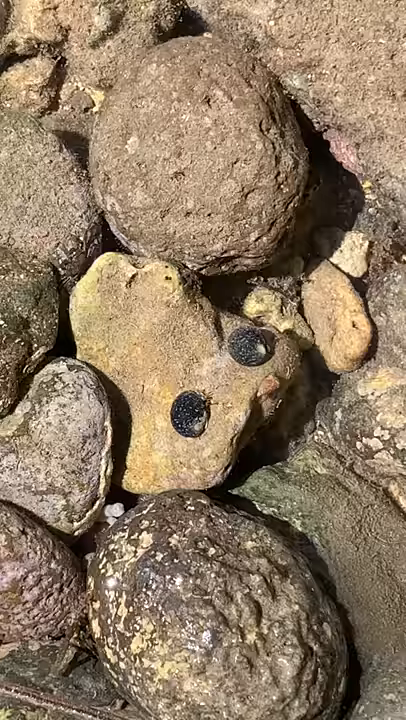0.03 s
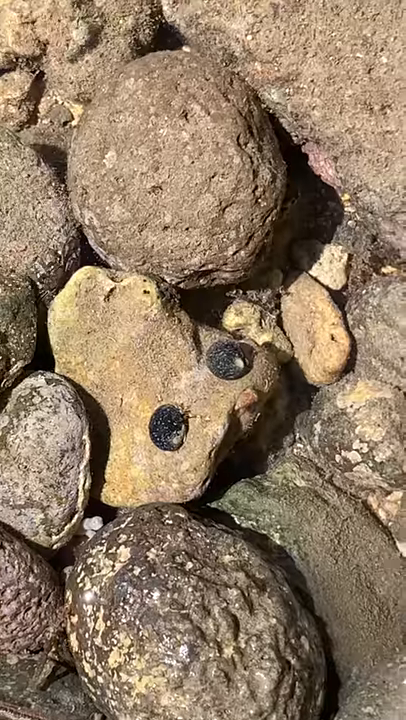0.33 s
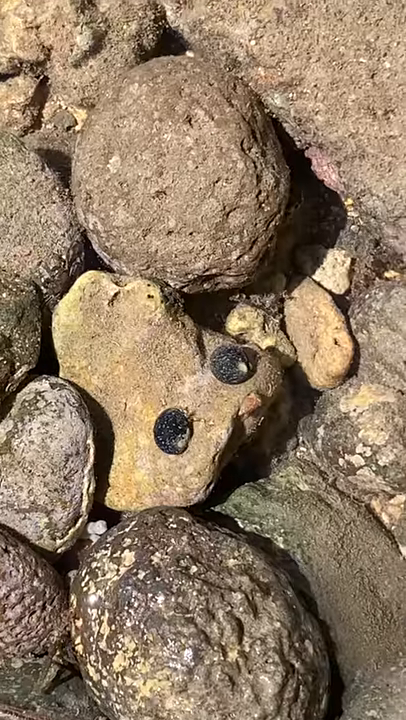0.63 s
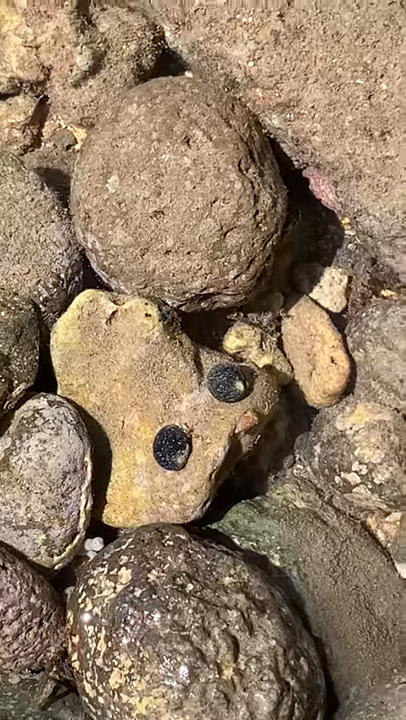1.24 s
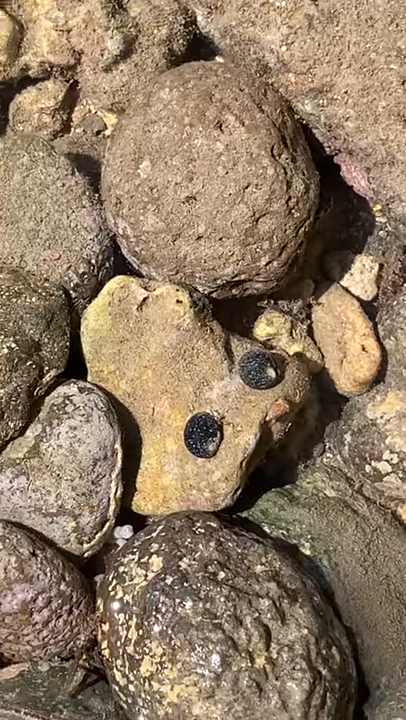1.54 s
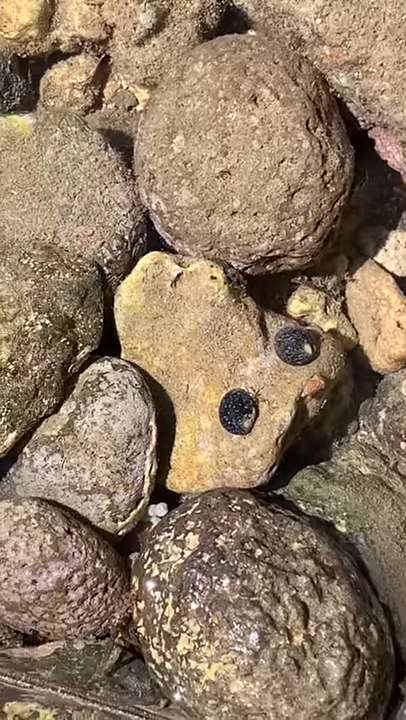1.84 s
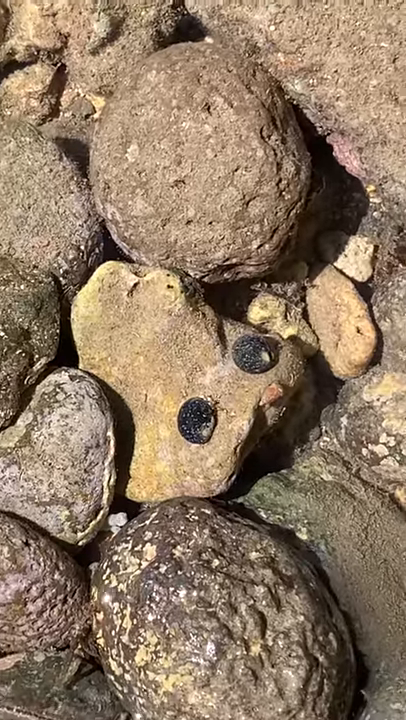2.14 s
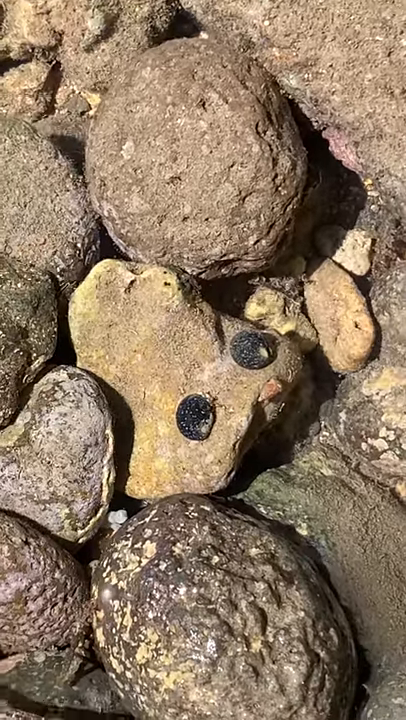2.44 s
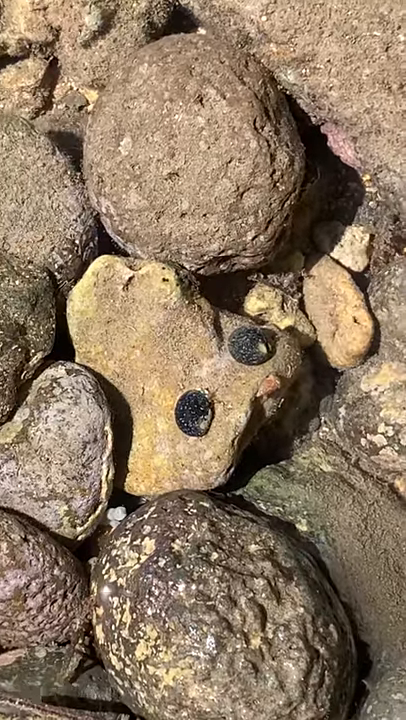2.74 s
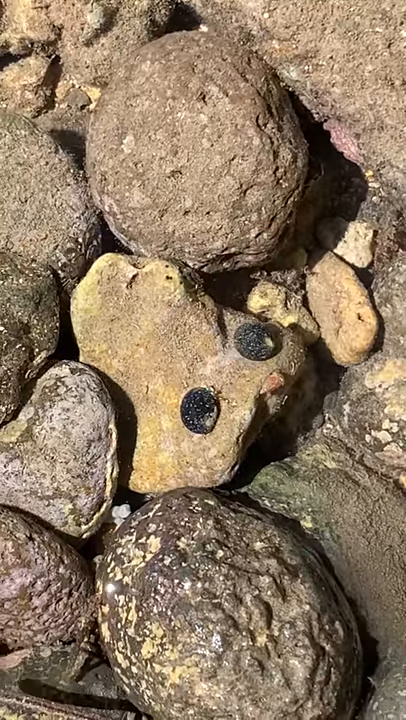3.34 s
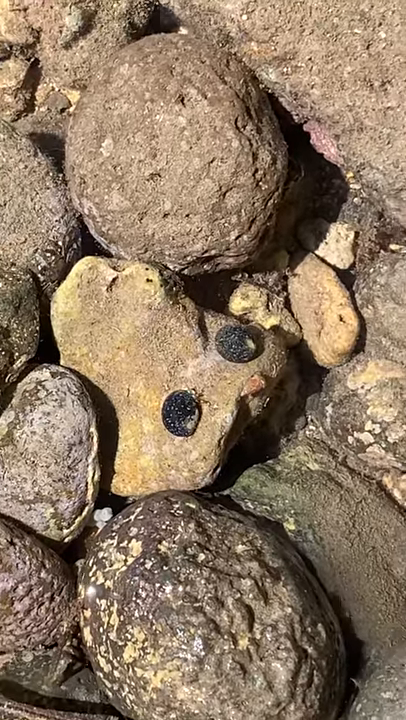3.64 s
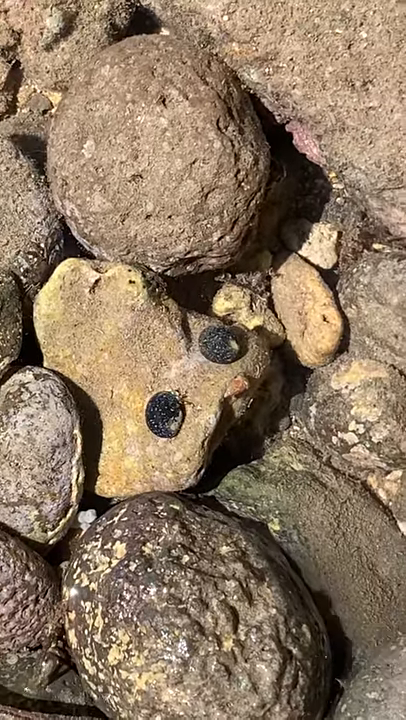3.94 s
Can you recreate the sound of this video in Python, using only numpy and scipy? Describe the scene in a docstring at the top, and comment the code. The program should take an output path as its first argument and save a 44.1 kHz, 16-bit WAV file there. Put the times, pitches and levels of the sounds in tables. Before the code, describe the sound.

A distant engine drones and rumbles throughout, over a soft wash of far surf that swells once past the middle. Water hisses faintly between shore stones, with a few light ticks, heard on a hand-held phone.

```python
"""Distant engine off a rocky shore

A far engine drones on a slowly sinking pitch, with a weaker second hum beside it. Its rumble and
a wash of far surf swell a little past the middle. Water hisses, bubbles and fizzes between the
stones, with a few faint ticks. A hand-held phone hears it all through two closely spaced ports."""
import sys
import numpy as np
from scipy import signal
from scipy.fft import rfft, irfft
from scipy.io import wavfile
from scipy.ndimage import uniform_filter1d

SR = 44100
rng = np.random.default_rng(int(sys.argv[2]) if len(sys.argv) > 2 else 0)


def log_audio(samples):
    """Write samples as a 16-bit WAV file to the path given in sys.argv[1]."""
    # one column per channel
    frames = np.atleast_2d(samples).T
    # limit to full scale, then quantise
    limited = np.clip(frames, -1, 1)
    pcm = np.round(limited * 32767).astype(np.int16)
    wavfile.write(sys.argv[1], SR, pcm)


N = 176400  # 4 seconds
TIME = np.arange(N) / SR


def undb(db):
    """Turn decibels into a number to multiply by."""
    return 10 ** (np.asarray(db) / 20)


def unit(x):
    """Scale a signal so that its average strength (rms) is 1."""
    return x / np.sqrt(np.mean(x ** 2))


def curve(rows):
    """Join (time, value) rows with straight lines."""
    return np.interp(TIME, *np.array(rows).T)


def walk(rate):
    """A smooth random wobble of size 1 that takes `rate` steps a second."""
    hold = max(int(SR / rate), 2)
    steps = np.repeat(rng.standard_normal(4000)[:N // hold + 1], hold)
    return unit(uniform_filter1d(uniform_filter1d(steps, hold), hold)[:N])


def hump(peak_s, half_s):
    """A bell-shaped rise and fall."""
    return np.exp(-.5 * np.minimum(((TIME - peak_s) / half_s) ** 2, 60))


def noise():
    """Two unrelated noises: the direct and the scattered part of a wide source."""
    return rng.standard_normal((2, N))


def shaped_noise(tone):
    """Noise of strength 1 whose tone follows (frequency, level) rows."""
    hz, db = np.array(tone).T
    f = np.maximum(np.fft.rfftfreq(N, 1 / SR), 1)
    gain = undb(np.interp(np.log(f), np.log(hz), db))
    return unit(irfft(rfft(noise()) * gain, N))


def resonate(x, hz, width_hz):
    """Keep one band of a sound by passing it twice through a resonance; strength 1."""
    b, a = signal.iirpeak(min(hz, .45 * SR), hz / width_hz, fs=SR)
    return unit(signal.sosfilt([np.r_[b, a]] * 2, x))


# The tones in the drone and in the second hum: multiple of the base pitch, relative level/dB
DRONE_TONES = [(1, -20), (2, 0), (3, -11.5), (4, -11.5), (5, -14), (6, -22), (16, -29.5)]
HUM_TONES = [(1, -2), (2, -10.5), (3, -18.5), (4, -10), (5, -19.5)]
# How loud the drone's main tone is: t/s, level/dB
MAIN_TONE_LEVEL = [(.1, -44.5), (.45, -39), (.77, -44), (.92, -36.5), (1.35, -41.5), (1.56, -33),
                   (1.72, -35), (1.95, -32), (2.22, -32), (2.36, -33), (2.58, -33.5), (2.85, -37),
                   (3.2, -36), (4.0, -37)]
# Rise and fall of the hum's lowest tone, and of all remaining tones: t/s, relative level/dB
HUM_BASE_SWELL = [(.1, 6), (.75, -11), (1.0, 2), (1.2, -5.5), (1.7, 8), (2.05, 5), (2.4, -10), (2.75, -13),
                  (3.2, 3), (4.0, -6)]
OTHER_TONES_SWELL = [(.1, -2), (.55, -1), (1.1, -0.5), (1.5, 1), (1.85, 1), (2.15, 8.5), (2.45, 12),
                     (2.7, -1), (2.9, -4.5), (3.3, -0.5), (3.7, 5.5), (4.0, -1)]

def engine():
    """A drone and a hum sink together in pitch; each tone fades in and out on its way through the air."""
    firing_hz, sag_hz_per_s, hum_hz = 64.47, .33, 76.25
    other_tones_db, hum_db = -39, -45
    hz = firing_hz - sag_hz_per_s * TIME
    drone_phase = 2 * np.pi * np.cumsum(hz * (1 + .0036 * walk(9))) / SR
    hum_phase = 2 * np.pi * np.cumsum(hum_hz * hz / firing_hz * (1 + .00586 * walk(8.27))) / SR
    swell_db = curve(OTHER_TONES_SWELL)

    def tone(phase, db):
        return np.sqrt(2) * np.sin(phase + rng.uniform(0, 2 * np.pi)) * undb(db)

    out = np.zeros((2, N))  # row 0 is direct sound, row 1 is scattered
    for multiple, db in DRONE_TONES:
        if multiple == 2:  # the main tone
            moving_db = curve(MAIN_TONE_LEVEL) + .27 * walk(8)
            jitter = 0
        else:
            moving_db = other_tones_db + swell_db + 2.5 * walk(9)
            jitter = .12 * walk(21.83)  # radians
        out[0] += tone(multiple * drone_phase + jitter, db + moving_db)
    for multiple, db in HUM_TONES:
        moving_db = curve(HUM_BASE_SWELL) if multiple == 1 else swell_db
        out[0] += tone(multiple * hum_phase, hum_db + db + moving_db + 1.1 * walk(7.74))
    return out


# Tone of the deep and the upper rumble: f/Hz, relative level/dB
DEEP_TONE = [(15, -48.5), (26, -35), (38, -5.5), (50, 10), (64, 18), (85, 11.5), (105, 11), (135, 12),
             (200, -64.5)]
UPPER_TONE = [(30, -41.5), (115, 0.5), (165, 0.5), (230, -0.5), (275, -4), (315, -7.5), (360, -11.5),
              (415, -15), (460, -16.5), (700, -80.5)]
# How each rises and falls: t/s, relative level/dB
DEEP_LEVEL = [(.1, -43.5), (.75, -45.5), (1.25, -41), (1.6, -40.5), (2.1, -41.5), (2.7, -43.5),
              (3.0, -45.5), (3.3, -41.5), (4.0, -43.5)]
UPPER_LEVEL = [(.1, -41), (.7, -40), (1.15, -42), (1.5, -36), (1.8, -42), (2.05, -37.5), (2.4, -33.5),
               (2.65, -37), (2.9, -45.5), (3.15, -41), (3.55, -37), (4.0, -39.5)]

def rumble():
    """The engine's turbulent roar: a deep part and a fluttering part above it."""
    deep = shaped_noise(DEEP_TONE) * undb(curve(DEEP_LEVEL) + 1.4)
    upper = shaped_noise(UPPER_TONE) * undb(curve(UPPER_LEVEL) - 4)
    flutter = undb(2.06 * walk(25))
    return deep + upper * flutter


# Tone of the low, middle and high parts of the surf: f/Hz, relative level/dB
LOW_SURF_TONE = [(300, -18), (430, 2.5), (560, 4), (615, 7.5), (740, 3.5), (900, -34.5)]
MID_SURF_TONE = [(650, -18), (790, -1), (915, 0.5), (1020, -8.5), (1120, 2.5), (1200, -3), (2000, -73)]
HIGH_SURF_TONE = [(900, -66), (1280, 6), (1450, 3.5), (1640, 1.5), (1850, -4.5), (2250, -4.5),
                  (2700, -11.5), (4000, -12), (8000, -56)]
# How each rises and falls: t/s, relative level/dB
LOW_SURF_LEVEL = [(.1, -53.5), (.85, -54.5), (1.1, -52), (1.5, -54.5), (2.1, -54), (2.85, -54), (3.3, -56),
                  (3.48, -53), (3.72, -53), (4.0, -54.5)]
MID_SURF_LEVEL = [(.1, -55), (.5, -59), (1.15, -55.5), (1.5, -54), (1.7, -53.5), (2.0, -54), (2.6, -54),
                  (2.9, -57.5), (3.3, -58.5), (3.5, -56.5), (3.72, -54), (3.9, -56)]
HIGH_SURF_LEVEL = [(.1, -62.5), (.55, -61), (.8, -63.5), (1.2, -61), (1.45, -59.5), (1.9, -58.5),
                   (2.2, -60), (2.75, -61.5), (3.3, -63.5), (3.7, -61.5), (4.0, -59)]

def surf():
    """Far waves blend into a wavering wash, made of three bands of noise."""
    low = shaped_noise(LOW_SURF_TONE) * undb(curve(LOW_SURF_LEVEL))
    middle = shaped_noise(MID_SURF_TONE) * undb(curve(MID_SURF_LEVEL) + 3)
    high = shaped_noise(HIGH_SURF_TONE) * undb(curve(HIGH_SURF_LEVEL) + 3)
    return flicker(low + middle + high) * undb(1.14 * walk(50))


def flicker(x, depth_db=1.8):
    """Each narrow band wavers on its own, as air and ground reflections shift."""
    f = np.fft.rfftfreq(N, 1 / SR)
    centres_hz = np.geomspace(500, 2400, num=12)
    spectrum = rfft(x)
    bands = (irfft(spectrum * np.interp(f, centres_hz, pick), N) for pick in np.eye(len(centres_hz)))
    return sum(band * undb(depth_db * walk(14)) for band in bands)


# Tone of the hiss: f/Hz, relative level/dB
HISS_TONE = [(1000, 2), (2200, 6.5), (3200, 11.5), (4000, -1), (4800, -1), (6000, 6), (6700, -2), (7400, 0),
             (8700, -7.5), (11000, -1.5), (14000, -35.5), (16000, -33)]
# How loud it is: t/s, level/dB
HISS_LEVEL = [(.1, -66), (.7, -65.5), (1.2, -67), (2.1, -69), (2.4, -67), (2.65, -66), (2.8, -69),
              (3.1, -67.5), (3.7, -66), (4.0, -67.5)]

def hiss():
    """Water hisses steadily between the stones."""
    return shaped_noise(HISS_TONE) * undb(curve(HISS_LEVEL) + .25 * walk(5.5))


def bubbles(per_s=320, low_hz=3000, high_hz=7070, quietest_db=-72.5, decay_cycles=36):
    """Tiny bubbles ring briefly at random pitches as the stones drain."""
    out = np.zeros((2, N))
    t = np.arange(SR // 25) / SR
    for when, pitch, size in rng.random((int(per_s * N / SR), 3)):
        hz = low_hz * (high_hz / low_hz) ** pitch
        db = quietest_db + 2.6 * min(-np.log(1 - size), 3)  # most are faint, a few louder
        ring = np.sin(2 * np.pi * hz * t) * np.exp(-t * hz / decay_cycles)
        start = int(when * (N - len(t)))
        out[0, start:start + len(t)] += undb(db) * ring
    return out


# One surge a row: peak t/s, half length/s, level/dB, f/Hz, width/Hz
SURGE_EVENTS = [(0.532, 0.15, -46, 306, 46), (0.465, 0.054, -50.5, 1000, 300), (0.74, 0.064, -56, 890, 90),
                (1.287, 0.029, -48.5, 900, 200), (1.4, 0.055, -46.5, 996, 380),
                (1.675, 0.024, -49, 1270, 348), (1.85, 0.086, -57.5, 1567, 149.5),
                (2.087, 0.011, -45.5, 924, 130), (2.084, 0.23, -39, 175, 101),
                (2.27, 0.081, -51.5, 630, 220), (2.613, 0.039, -49.5, 900, 161),
                (2.704, 0.055, -42, 178, 34.8), (3.703, 0.064, -52, 914, 223)]

def surges():
    """The surf and the rumble rise briefly in one narrow band at a time, which sounds hollow."""
    return sum(resonate(noise(), hz, width) * undb(db) * hump(peak_s, half_s)
               for peak_s, half_s, db, hz, width in SURGE_EVENTS)


# One tick a row: t/s, relative level/dB, f/Hz, width/Hz, decay/s
TICK_EVENTS = [(.668, -45.5, 3220, 1300, 0.0053), (.670, -52.5, 6900, 2200, 0.011),
               (.669, -59, 11000, 6000, .007), (1.147, -51.5, 9600, 6000, .003),
               (1.185, -59, 11000, 8000, .002), (2.224, -50, 11900, 9000, 0.0052),
               (3.271, -43.5, 4030, 1200, 0.003), (3.709, -40, 15500, 2000, .001),
               (3.710, -48, 10000, 6000, 0.00092), (3.913, -48, 15300, 2000, .0015),
               (3.972, -39.5, 2680, 1400, 0.0058)]

def ticks():
    """Faint close ticks: each is a band of noise that starts sharply and dies away."""
    t = np.arange(SR // 10) / SR
    out = np.zeros((2, N + len(t)))
    for start_s, db, hz, width, decay_s in TICK_EVENTS:
        start = min(int(start_s * SR), N)
        burst = resonate(rng.standard_normal(len(t)), hz, width) * np.exp(-t / decay_s)
        out[0, start:start + len(t)] += .5 * undb(db) * burst
    return out[:, :N]


# One spell of fizz a row: peak t/s, half length/s, level/dB, f/Hz, width/Hz
FIZZ_SPELLS = [(0.746, 0.053, -71, 6460, 2220), (2.22, 0.025, -66, 6600, 2500),
               (2.299, 0.2, -65.5, 3080, 1590), (2.624, 0.065, -77, 6300, 3000),
               (3.132, 0.038, -69, 5900, 1400), (3.436, 0.016, -66, 5700, 1900),
               (3.44, .014, -62.5, 3400, 1600), (3.534, .03, -65, 3900, 2500)]

def fizz(grain_db=2.5, grains_per_s=170):
    """Water fizzes between the stones in short, grainy spells."""
    spells = sum(resonate(noise(), hz, width) * undb(db) * hump(peak_s, half_s)
                 for peak_s, half_s, db, hz, width in FIZZ_SPELLS)
    grain = unit(undb(grain_db * walk(grains_per_s)))
    return spells * grain


# The bands that ring in the big swell: f/Hz, width/Hz, relative level/dB
SWELL_BANDS = [(396.5, 38, -0.5), (548, 21, -6.5), (634, 47, -5.5), (754, 33, -8.5), (850, 45, -12),
               (917, 93, 0.5), (1032, 48, -4), (1174, 76, -3), (1245, 140, -4), (1520, 110, -9),
               (1647, 93, -9), (2000, 1000, -14)]

def swell(peak_s=2.416, rise_s=.14, fall_s=.11, peak_db=-37):
    """The surf rises once, hollow with narrow resonances, and falls away faster than it came."""
    shape = hump(peak_s, np.where(TIME < peak_s, rise_s, fall_s))
    rings = sum(resonate(noise(), hz, width) * undb(db) for hz, width, db in SWELL_BANDS)
    return unit(rings) * shape * undb(peak_db)


# How the phone's two microphone openings (ports) hear each frequency:
# f/Hz, left's lead/radians, likeness of the sides (0 to 1), left minus right level/dB
PORT_RESPONSE = [(20, 0, 1, 0), (170, 0, 1, 0), (300, 0, .98, -3.3), (390, -.7, .88, -6),
                 (475, -1.1, .3, -1), (620, -1.2, .65, -2.2), (780, 0, .35, .5), (880, .2, .92, 1),
                 (1000, 1.4, .93, -.8), (1330, 3.5, .55, 2.4), (1620, 6.1, .85, 1.2), (1850, 6.7, .5, 1),
                 (2400, 8, .6, .5), (3200, 7.5, .62, 0), (3800, 7.9, .8, .3), (4200, 8.8, .87, .3),
                 (4700, 9.4, .92, 0), (9000, 15.7, .9, 0), (13300, 22, .86, 0), (16000, 25.8, .7, 0)]

def ports(direct, scattered):
    """Make left and right: scattered sound adds on one side and subtracts on the other."""
    margin = SR // 10  # padding keeps the end from wrapping round to the start
    padded = np.pad([direct, scattered], ((0, 0), (0, margin)), mode="reflect", reflect_type="odd")
    direct, scattered = rfft(padded)
    f = np.fft.rfftfreq(N + margin, 1 / SR)
    hz, *columns = np.array(PORT_RESPONSE).T
    lead, alike, pan_db = (np.interp(f, hz, column) for column in columns)
    side = np.array([[1], [-1]])  # left, right
    both = direct * np.sqrt((1 + alike) / 2) + side * scattered * np.sqrt((1 - alike) / 2)
    phase_shift = np.exp(.5j * side * lead)
    balance = undb(side * pan_db / 2)
    return irfft(both * phase_shift * balance, N + margin)[:, :N]


def scene():
    """The engine and the water all reach the two ports."""
    direct, scattered = (engine() + rumble() + surf() + hiss() + bubbles()
                         + surges() + ticks() + fizz() + swell())
    return ports(direct, scattered)


def record(dry):
    """The phone fades in quickly after a moment of silence and cuts the highest treble."""
    silence_s, fade_s, top_hz = .0705, .004, 15700
    fade_in = np.sin(np.pi / 2 * np.clip((TIME - silence_s) / fade_s, 0, 1)) ** 2
    treble_cut = signal.ellip(8, .2, 70, top_hz, fs=SR, output="sos")
    return signal.sosfilt(treble_cut, dry * fade_in)


dry = scene()
out = record(dry)
log_audio(out)
```